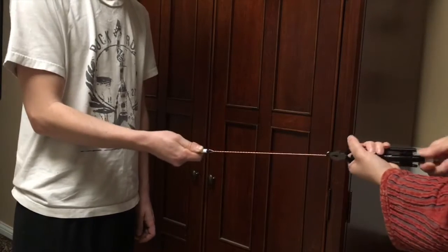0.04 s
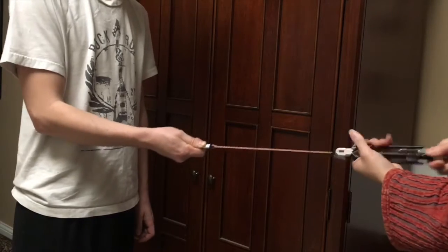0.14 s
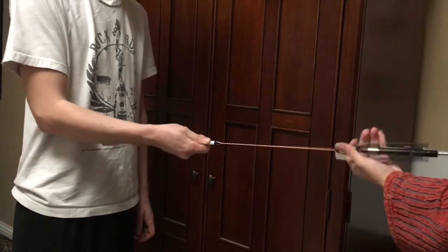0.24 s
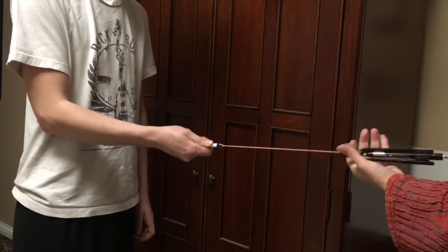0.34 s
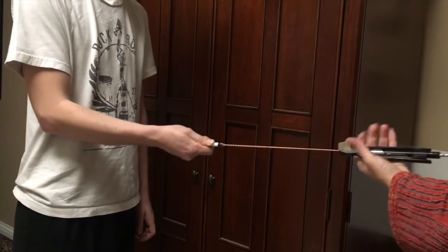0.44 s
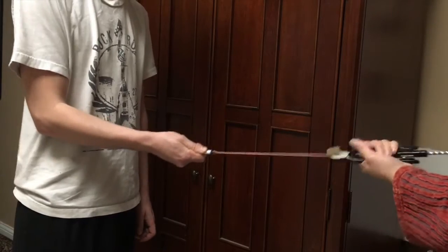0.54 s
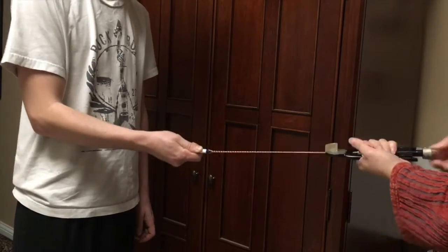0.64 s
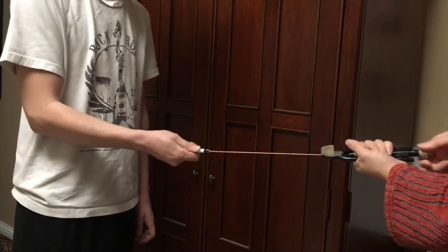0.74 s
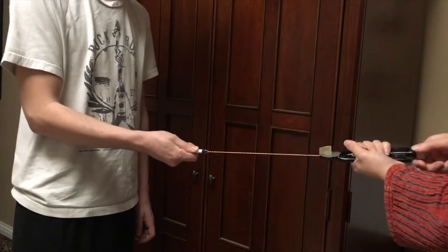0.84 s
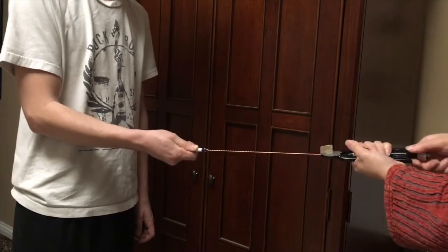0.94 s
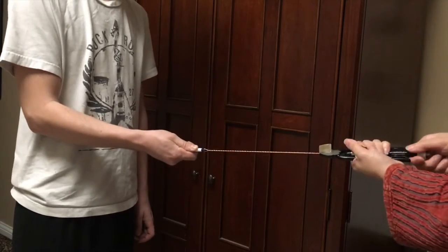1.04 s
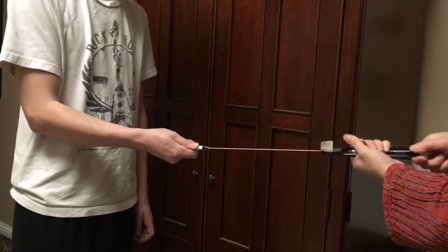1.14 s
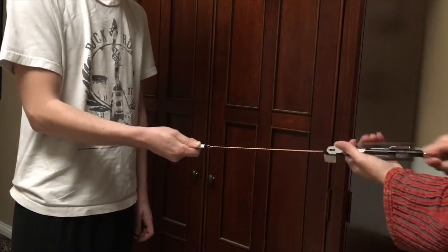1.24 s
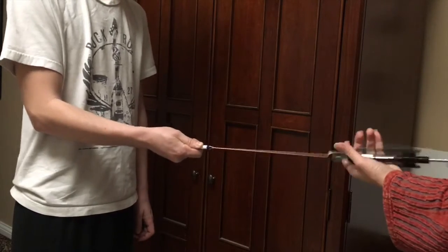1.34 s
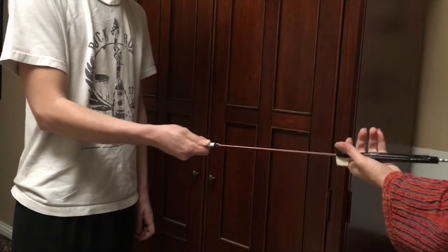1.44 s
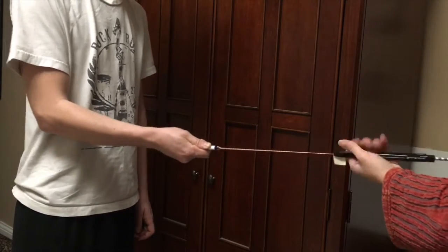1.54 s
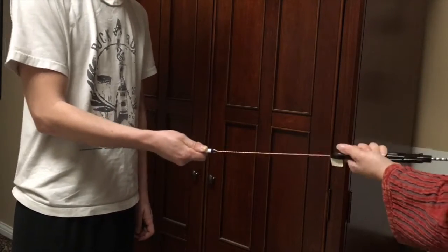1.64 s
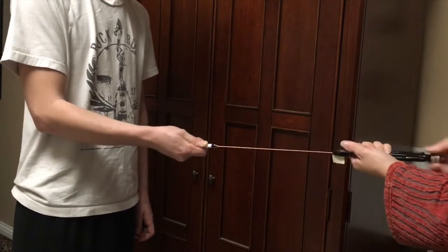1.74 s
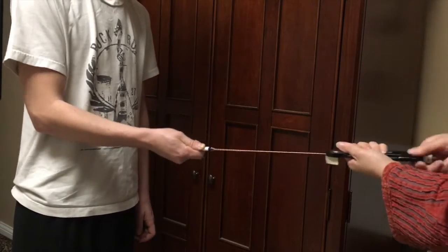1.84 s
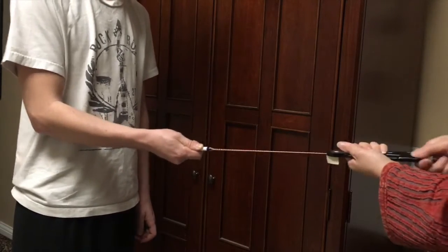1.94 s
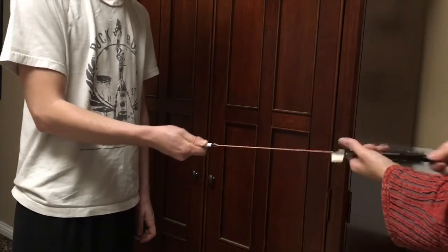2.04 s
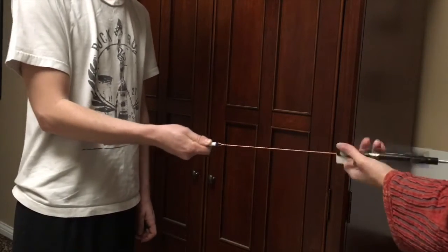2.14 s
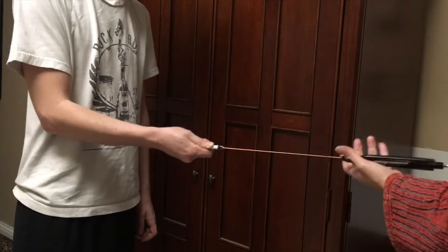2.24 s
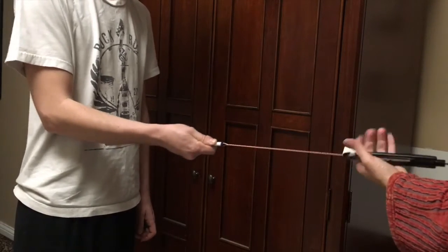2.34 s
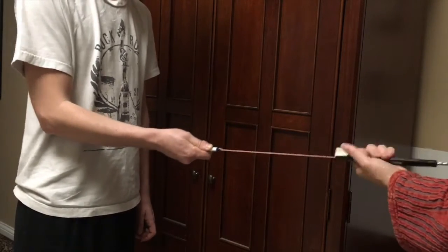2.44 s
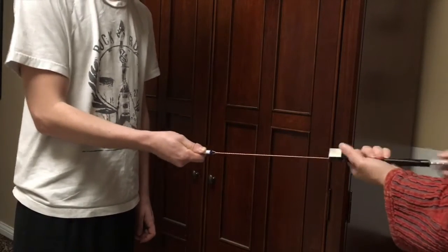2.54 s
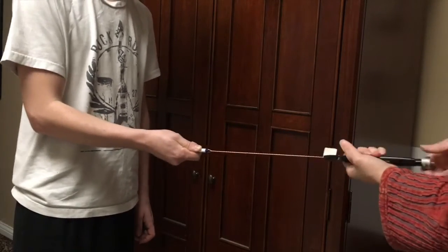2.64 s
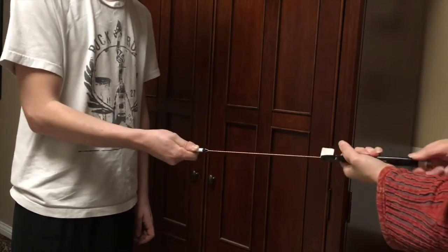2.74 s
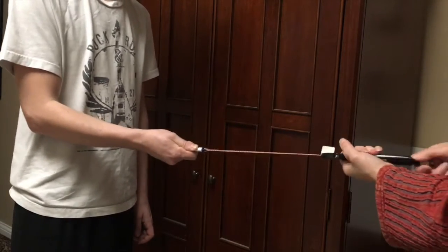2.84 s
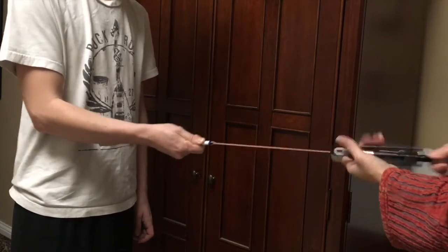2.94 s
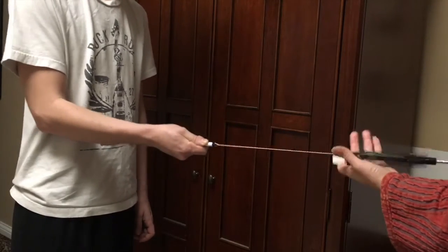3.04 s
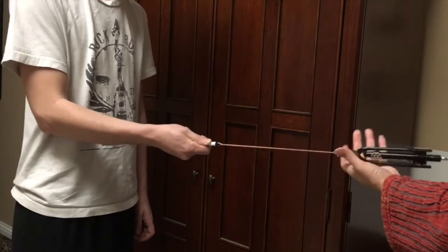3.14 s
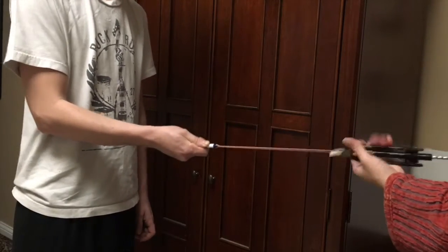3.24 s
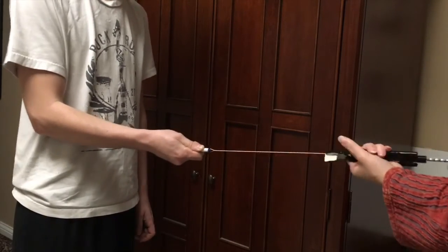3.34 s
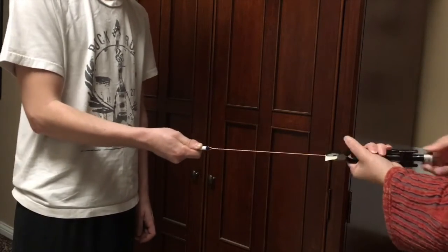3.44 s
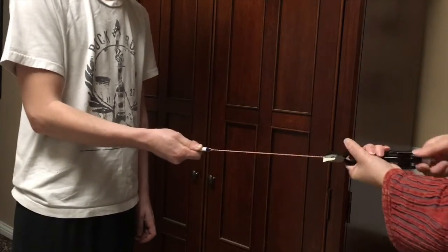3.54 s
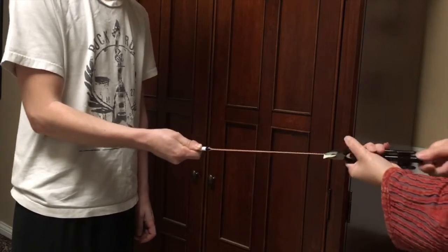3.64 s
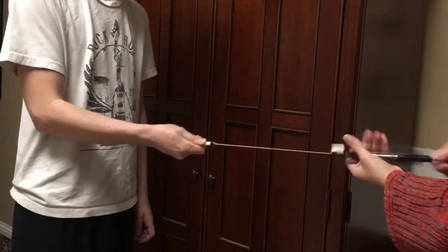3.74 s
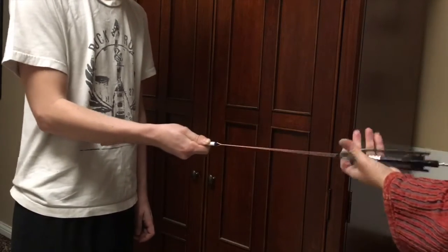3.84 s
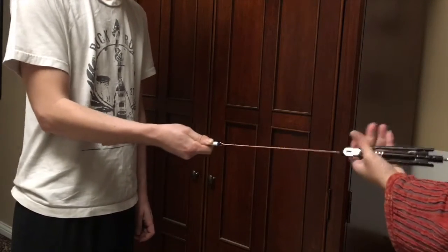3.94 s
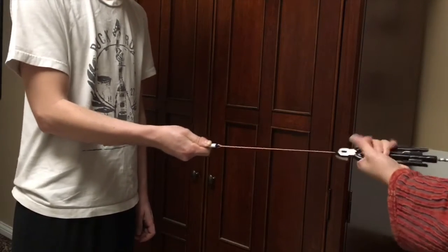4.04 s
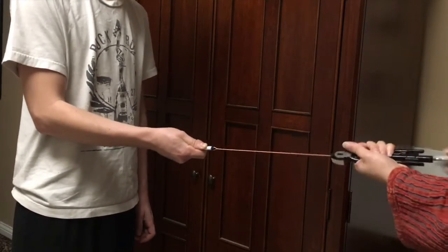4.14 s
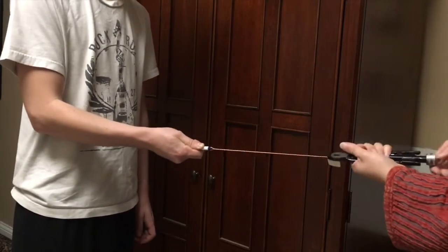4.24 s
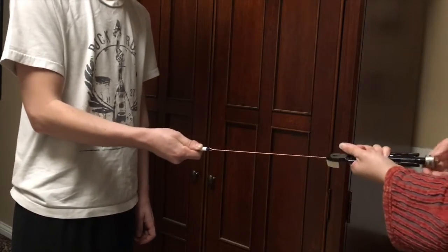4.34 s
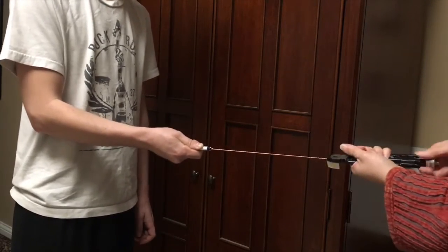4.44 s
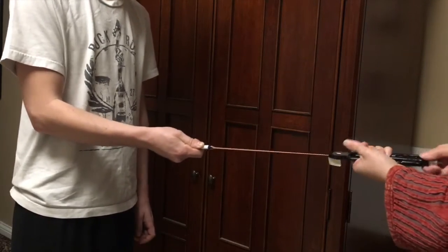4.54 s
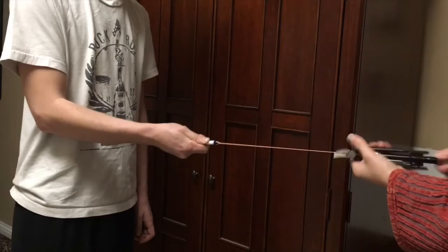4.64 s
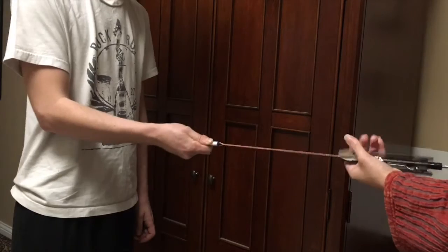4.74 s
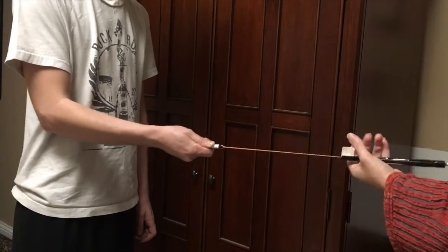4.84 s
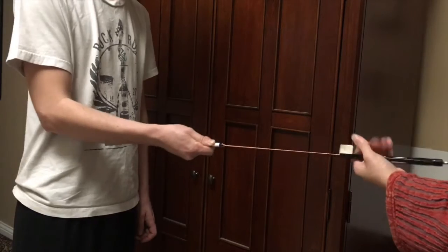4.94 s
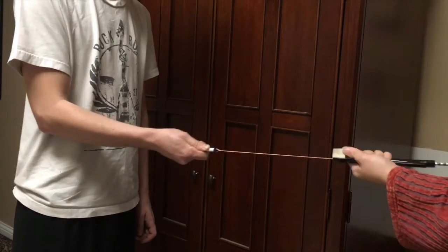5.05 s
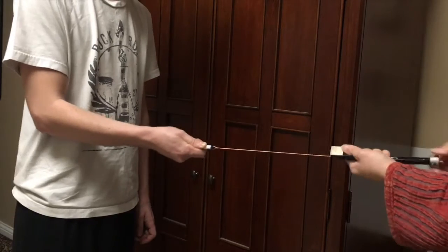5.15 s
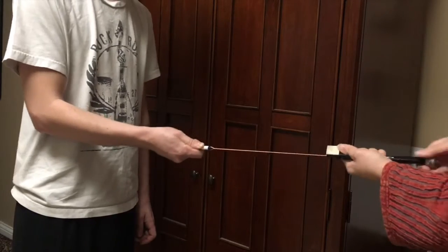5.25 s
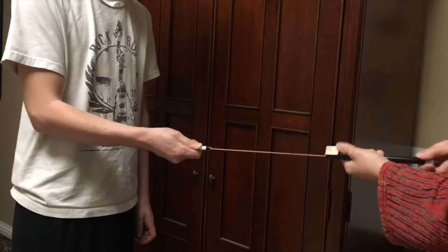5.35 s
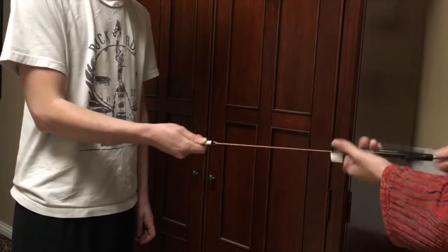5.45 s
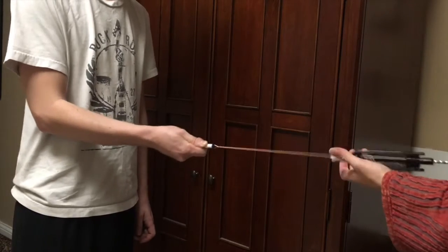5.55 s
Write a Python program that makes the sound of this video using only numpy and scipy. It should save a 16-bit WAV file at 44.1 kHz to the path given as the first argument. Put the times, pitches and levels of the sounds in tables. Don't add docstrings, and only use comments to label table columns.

```python
import sys
import numpy as np
from scipy import signal
from scipy.io import wavfile
from scipy.ndimage import uniform_filter1d

SR = 44100
rng = np.random.default_rng(int(sys.argv[2]) if len(sys.argv) > 2 else 0)


def transcribe(u):
    v = np.clip(np.atleast_2d(u).T, -1, 1)
    q = np.round(v * 32767).astype(np.int16)
    wavfile.write(sys.argv[1], SR, q)


def field_ratio(decibels):
    return 10 ** (np.asarray(decibels, dtype=float) / 20)


N = 246959


def evened(x):
    return x / np.sqrt(np.mean(x ** 2) + 1e-20)


def band(x, lo_hz, hi_hz):
    return signal.sosfilt(signal.butter(2, [lo_hz, hi_hz], "band", fs=SR, output="sos"), x)


def read(points, hz):
    f, value = np.transpose(points)
    return np.interp(np.log(hz + 1), np.log(f + 1), value)


def follow(rows, column=1):
    rows = np.array(rows)
    return field_ratio(np.interp(np.arange(N) / SR, rows[:, 0], rows[:, column], left=-120, right=-120))


def add(mix, s, sound):
    part = mix[:, round(s * SR):][:, :sound.shape[1]]
    part += sound[:, :part.shape[1]]


# pitch_hz, level_db (per Hz)
ROOM_TONE = [(88, -46), (150, -13), (231, -8.5), (297, -11), (348, -17.5), (601, -26), (730, -24.5),
             (960, -23), (2220, -41.5), (4320, -38), (5050, -41.5), (12900, -37), (16000, -33)]


def room_tone():
    frames, hz = N // 512 + 5, np.fft.rfftfreq(2048, 1 / SR)
    a, b, patches = rng.standard_normal((frames, 1025, 3)).T
    patches = uniform_filter1d(patches, size=3, axis=0)
    patches = evened(uniform_filter1d(patches, size=30, axis=1))
    z = (a + 1j * b) * field_ratio(read(ROOM_TONE, hz)[:, None] + 2.0 * patches)
    noise = signal.istft(z, nperseg=2048, noverlap=1536)[1][:N]
    return field_ratio(-61.5) * evened(noise)


def engine_tone(hz, width_hz):
    r = np.exp(-np.pi * width_hz / SR)
    sway = signal.lfilter([1], [1, -r], rng.standard_normal((2, N)))
    turning = np.exp(2j * np.pi * np.cumsum(hz) / SR)
    return evened(((sway[0] + 1j * sway[1]) * turning).real)


# time_s, rumble_db, hum_db
DRIFT = [(0.0, -66, -60.5), (0.3, -66, -70.5), (0.37, -58.5, -58), (0.65, -66, -58.5), (2.28, -59, -55.5),
         (2.76, -68.5, -62), (2.96, -62, -60.5), (3.65, -67, -64.5), (3.77, -61.5, -59), (4.26, -62, -62.5),
         (4.7, -65, -59.5), (5.43, -67, -62), (5.6, -68, -66)]
# time_s, upper_db, upper_hz, lower_hz
ENGINES = [
    (0.0, -63, 209.7, 112.6),
    (0.22, -71, 183, 86.6),
    (0.701, -67, 192.4, 124.4),
    (1.54, -59.5, 204.9, 113),
    (1.67, -68.5, 169.5, 111),
    (2.818, -69.5, 219.9, 121.1),
    (3.168, -77.5, 181.7, 71.17),
    (5.22, -64.5, 218.1, 90.4),
    (5.6, -64.5, 215.5, 84.3),
]


def rumble():
    low, upper = rng.standard_normal((2, N))
    s, _, upper_hz, lower_hz = np.transpose(ENGINES)
    t = np.arange(N) / SR
    low = evened(band(band(low, 48, 135), 40, 160))
    low = low + .9 * engine_tone(np.interp(t, s, lower_hz), 5)
    upper = .6 * evened(band(upper, 160, 235))
    upper = upper + .9 * engine_tone(np.interp(t, s, upper_hz), 6)
    return follow(DRIFT) * field_ratio(-3.0) * low + follow(ENGINES) * upper


def hum(pitch_hz=288, width_hz=12, steady=3.6):
    r = np.exp(-np.pi * width_hz / SR)
    waver = signal.lfilter([1], [1, -2 * r, r * r], rng.standard_normal((2, N + SR)))[:, SR:]
    waver = waver / waver.std()
    turning = np.exp(2j * np.pi * pitch_hz * np.arange(N) / SR)
    tone = (steady + 0.68 * (waver[0] + 1j * waver[1])) * turning
    return follow(DRIFT, column=2) * evened(tone.real)


def ring(modes):
    t = np.arange(12000) / SR
    h = 0
    for k, (hz, width_hz, db) in enumerate(modes):
        fading = np.sqrt(width_hz) * np.exp(-np.pi * width_hz * t)
        h = h + (-1) ** k * field_ratio(db) * fading * np.sin(2 * np.pi * hz * t)
    h = h * (1 - np.exp(-t / 0.00015))
    return h / np.linalg.norm(h)


# pitch_hz, width_hz, level_db
JAWS = [(5456, 770, 5.5), (6200, 640, 2), (6880, 680, 2.5), (8110, 660, -5)]
# pitch_hz, width_hz, level_db
HANDLES = [(1459, 360, -11.5), (1790, 282, -0.5), (2098, 830, 1), (2450, 230, 0.5)]
# pitch_hz, width_hz, level_db
ROD = [(4146, 210, 0.15), (4590, 330, -1.1)]
# pitch_hz, width_hz, level_db
SPRING = [(8590, 1000, -6), (9896, 740, 2.5)]
# pitch_hz, width_hz, level_db
SLEEVE = [(13800, 630, -2.5), (13300, 330, -10), (15330, 1800, 9)]
# pitch_hz, width_hz, level_db
SHAFT = [(4060, 45, -5), (4140, 17, 0), (4242, 32, -4), (4334, 40, -8)]
# pitch_hz, width_hz, level_db
PIVOT = [(2850, 880, -3), (3694, 1300, 1.6)]
# pitch_hz, width_hz, level_db
LATCH = [(11370, 360, 7), (12360, 1200, 2)]


def steel(force):
    parts = (JAWS, HANDLES, ROD, SPRING, SLEEVE, SHAFT, PIVOT, LATCH)
    return sum(signal.oaconvolve(f, ring(p))[:N] for f, p in zip(force, parts))


def shares(db, bright_db, weight_db, rod_db, spring_db):
    handles, rod = db + weight_db, db + rod_db
    spring = db + spring_db + .45 * bright_db
    return np.array([db, handles, rod, spring, db + bright_db, rod - 2.0, handles + 2.5, spring - 3.0])


def rubbing(slips_per_s=800, spread_db=4.5, smooth=.5):
    force = np.zeros((8, N))
    slips = field_ratio(spread_db * np.minimum(rng.exponential(1, N), 4)) * (rng.random(N) < slips_per_s / SR)
    judder = uniform_filter1d(rng.standard_normal((8, N)), size=500, axis=1)
    judder = field_ratio(3.5 * evened(judder))
    grit = judder * (evened(slips) + smooth) * rng.standard_normal((8, N))
    held_db = 40 * (np.arange(8) == 5)[:, None]
    for s, db, bright_db, weight_db in catches() + run_ups() + lurches() + coasting() + slow_draw():
        u = np.arange(s[0], s[-1], 1 / SR)
        effort_db = shares(np.interp(u, s, db), bright_db, weight_db, rod_db=-6, spring_db=-2)
        onset = np.clip((u - s[0]) / 0.00057 + 0.0072, 0, 1)
        add(force, max(s[0], 0), field_ratio(effort_db - 9.5 - held_db) * onset)
    return force * grit / grit.std()


# start_s, length_s, effort_db, brightness_db, weight_db
CATCHES = [(0.0, 0.042, -37.5, -11.5, -12.5), (0.173, 0.13, -51.5, -6, -10), (0.216, 0.088, -59, 12, -6),
           (0.261, 0.042, -43, 5.5, -4), (0.315, 0.039, -42, -4.5, -8), (0.595, 0.042, -58, 1.5, -6),
           (0.649, 0.041, -39.5, -5, -8), (0.692, 0.021, -38, 14, -12), (1.759, 0.04, -40, 6, -8.5),
           (2.214, 0.031, -40.5, -17.5, -13.5), (2.497, 0.028, -58.5, 2.5, -3),
           (2.608, 0.017, -33.5, 15, -4), (3.042, 0.052, -39.5, 7, -4), (3.128, 0.027, -53, -4.5, -13.5),
           (3.475, 0.028, -45.5, 5, 1.5), (3.83, 0.047, -41.5, 7.5, -7.5), (3.916, 0.062, -58, 9.5, -12.5),
           (4.21, 0.033, -39.5, 12, -1.5), (4.741, 0.11, -43.5, 8, -6), (4.844, 0.18, -55.5, -6.5, -5),
           (5.16, 0.021, -33, 0, -8), (5.53, 0.033, -47.5, 8, -3)]


def catches():
    out = []
    for s, length, db, *colour in CATCHES:
        times = [s, s + .2 * length, s + length]
        out.append((times, [db - 5, db, db - 8.5 - 130 * length], *colour))
    return out


# peak_s, level_db, fade_s
CLOTH = [
    (0.208, -56, 0.078),
    (1.31, -52, 0.15),
    (4.79, -63.5, 0.069),
]


def cloth():
    brush = 0
    for s, db, fade_s in CLOTH:
        brush = brush + follow([(s - 0.1, db - 32), (s, db), (s + fade_s, db - 10.5)])
    return brush * evened(band(rng.standard_normal(N), 250, 1700))


KNOCK_TRIM_DB = [-8.5, -2, 0.5, 0, 2, -10.5, 1, 4]


def knocks(rows, chatter_s, first):
    force, t = np.zeros((8, N)), np.arange(300) / SR
    draw = rng.standard_normal((len(rows), 8, 301))
    chatter = draw[:, :, 1:] * np.exp(-t / chatter_s)
    reached = np.minimum(abs(draw[:, :, :1]) * 18, 60).astype(int)
    chatter = chatter + first * (np.arange(300) == reached)
    for (s, levels_db), c in zip(rows, chatter):
        size = field_ratio(levels_db + KNOCK_TRIM_DB)[:, None]
        add(force, s, 8 * size * c / np.linalg.norm(c, axis=1, keepdims=True))
    return force


# time_s, strength_db, brightness_db, weight_db
PULL_CLICKS = [(0.215, -60, 9, -10), (0.2765, -44, 12.5, -5), (0.2837, -39, -3, -9),
               (0.3205, -33, 2.5, -13), (1.271, -50, 4, -14.5), (1.343, -38, 2.5, -12),
               (1.3564, -47.5, 11.5, 0), (1.4022, -35, 4, -12.5), (2.125, -53.5, -4, -17),
               (2.1929, -40.5, -4.5, -6.5), (2.2362, -34, 4.5, -22), (2.257, -41.5, 1, -8.5),
               (3.1105, -26, 1.5, -16), (3.801, -57.5, 12, -12), (3.902, -28.5, 4, -16),
               (4.6979, -62, 16, -4), (4.7671, -40, 3, -18), (4.8237, -33.5, 9, -15.5),
               (5.5083, -63, 11, -6), (5.5451, -38, -10, -6.5), (5.5913, -19, -17, -39)]
# time_s, strength_db, brightness_db, weight_db
HOME_CLICKS = [(0.5432, -31, -6.5, -40.5), (0.5875, -27.5, -27.5, -19.5), (0.6891, -25.5, -7, -16),
               (1.073, -60, -7, -2.5), (1.677, -47.5, -12.5, -13.5), (1.6871, -40, -24.5, -12),
               (1.724, -37, -24, -20.5), (1.7705, -29.5, -28, -23), (2.4826, -47.5, 7.5, -14.5),
               (2.5086, -38.5, -10, -49), (3.3253, -49, -1.5, -25), (3.337, -53, 7.5, -25),
               (3.3528, -60.5, 18, -2), (3.3616, -38, -20, -16.5), (3.3728, -41.5, -25, -13.5),
               (3.4704, -27.5, -2, -18.5), (3.577, -42, -16, -10), (4.134, -49, -5.5, -13),
               (4.148, -27, -12.5, -21), (4.1758, -32, -23, -29), (4.1833, -27.5, -29, -20),
               (4.2212, -25.5, -12, -17), (5.0505, -51, -4.5, -17), (5.0744, -53, -14, -10),
               (5.0891, -37, -25.5, -11.5), (5.113, -41.5, -2, -30)]


def clicks():
    taps = []
    for rows, rod_db in ((PULL_CLICKS, 3), (HOME_CLICKS, 0)):
        for s, db, bright, weight in rows:
            taps.append((s, shares(db, bright, weight, weight + rod_db, spring_db=-9.5)))
    return knocks(taps, chatter_s=0.0013, first=2.0)


# start_s, length_s, final_effort_db, brightness_db, weight_db
RUN_UPS = [(0.555, 0.035, -55, 7, -6), (1.662, 0.12, -46, -2, -3), (2.072, .06, -65, 16, -12),
           (2.142, 0.051, -50.5, 14.5, -4.5), (2.556, 0.045, -40, -7, -14), (2.995, 0.054, -47, 9.5, -4.5),
           (3.378, .045, -61, -8, -5), (3.421, .042, -40, -3, -4.5), (3.751, 0.1, -53, 14.5, -5),
           (4.155, 0.047, -44, -17, -7), (4.669, 0.063, -56.5, 10, -3.5), (5.035, 0.071, -58, -3, -10),
           (5.123, 0.03, -38, -5, -9.5), (5.477, 0.066, -49.5, 13.5, -7.5)]


def run_ups():
    out = []
    for s, length, db, *colour in RUN_UPS:
        out.append(([s, s + length], [db - 10 - 130 * length, db], *colour))
    return out


def lurches():
    return [([s - 0.0028, s - .002], [db - 38, db - 25], -3., -3.) for s, db, *_ in SLAMS]


# time_s, strength_db, rod_ring_db, brightness_db, pivot_shake_db
SLAMS = [
    (0.7122, -10.5, -4, 1.5, 0.5),
    (1.798, -11, 7, -1.5, -2),
    (2.6362, -11.5, -10, 1, -0.5),
    (3.4978, -14, 12, 3, 2.5),
    (4.2407, -10.5, -9, -1, 1),
    (5.1878, -10.5, -6, -1, -1.5),
]
SLAM_PARTS_DB = [0, -17, -21, -7.5, -13.5, -26, -13, -16.5]
LET_GO_DB = [0, 0, -3, 0, 0, 9, 0, 0]


def slams():
    blows = []
    for s, db, rod, bright, pivot in SLAMS:
        colour_db = [0, 0, 0.65 * rod, bright, bright, rod, pivot, bright]
        blows.append((s, db + np.add(SLAM_PARTS_DB, LET_GO_DB) + colour_db))
    return knocks(blows, chatter_s=.0016, first=10)


def thud(handle_force):
    return field_ratio(-32.5) * signal.oaconvolve(handle_force, ring([(660, 500, 0)]))[:N]


COAST_DB = [-61, -56.5, -63, -62, -61.5, -62.5]


def coasting(wait_s=0.16, length_s=0.3, db_per_s=-69):
    out = []
    for (slam_s, *_), db in zip(SLAMS, COAST_DB):
        s = slam_s + wait_s
        out.append(([s, s + length_s], [db, db + db_per_s * length_s], -14., -3.))
    return out


# time_s, effort_db
SCRAPE = [
    (1.208, -70.5),
    (1.237, -54.5),
    (1.3, -44),
    (1.414, -47.5),
    (1.551, -63.5),
]


def slow_draw():
    return [(*np.transpose(SCRAPE), 1, -2.5)]


# time_s, level_db
FREE_RINGS = [
    (3.499, -9),
    (3.577, -18),
]


def free_shaft():
    force = np.zeros((8, N))
    for s, db in FREE_RINGS:
        add(force[5:6], s, field_ratio(db) * np.ones((1, 1)))
    return force


def pliers():
    blows = slams() + free_shaft()
    return steel(blows + rubbing()) + thud(blows[1]), steel(clicks())


# pitch_hz, time_s (to fall 60 dB)
ROOM = [(800, 0.33), (2100, 0.36), (5600, 0.35), (10000, 0.29), (15000, 0.19)]


def tail():
    taps = np.zeros(SR // 2)
    at = np.arange(130, SR // 2 - 12, 12)
    taps[at + rng.integers(0, 12, len(at))] = rng.choice([-1., 1.], len(at))
    hz, t, z = signal.stft(taps, SR, nperseg=256)
    h = signal.istft(z * field_ratio(-60 * t / read(ROOM, hz)[:, None]), SR, nperseg=256)[1]
    return h / np.linalg.norm(h)


# delay_s, level_db
ECHOES = [
    (.0028, -2),
    (.0060, -3.5),
    (0.009, -18.5),
    (0.014, -21),
    (.022, -17),
]


def room(heavy, light):
    panels = np.zeros(1500)
    smear = rng.standard_normal((len(ECHOES), 40)) * np.exp(-np.arange(40) / 12)
    for (s, db), taps in zip(ECHOES, smear):
        add(panels[None], s, field_ratio(db) * taps[None] / np.linalg.norm(taps))
    out = heavy + light + signal.oaconvolve(heavy + field_ratio(-4.5) * light, panels)[:N]
    send = field_ratio(1.5) * heavy + field_ratio(-5) * light
    turn = np.arange(N) / SR * 2.3
    for k in range(3):
        share = np.sqrt(2 / 3) * np.cos(turn + k * np.pi / 3)
        out += signal.fftconvolve(send * share, tail())[:N]
    return out


def scene():
    background = room_tone() + rumble() + hum()
    return (background + cloth() + room(*pliers()))[None]


def low_pass(x):
    return signal.sosfilt(signal.butter(12, 17150, fs=SR, output="sos"), x)


def record(dry):
    edge = signal.firwin(601, 15790, window=("kaiser", 6), fs=SR)
    x = signal.oaconvolve(dry, edge[None], "same")
    mix = x + field_ratio(-32.5) * (dry - x)
    return low_pass(mix)


dry = scene()
out = record(dry)
transcribe(out)
```